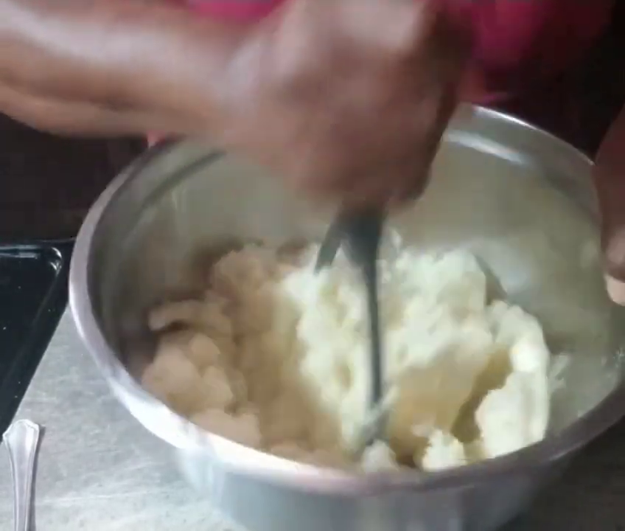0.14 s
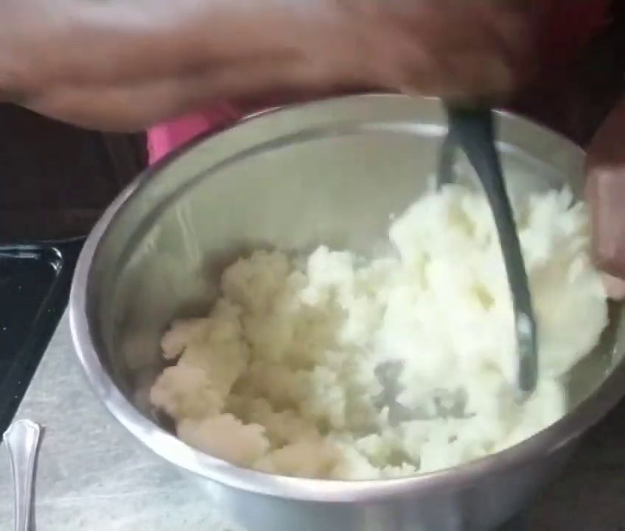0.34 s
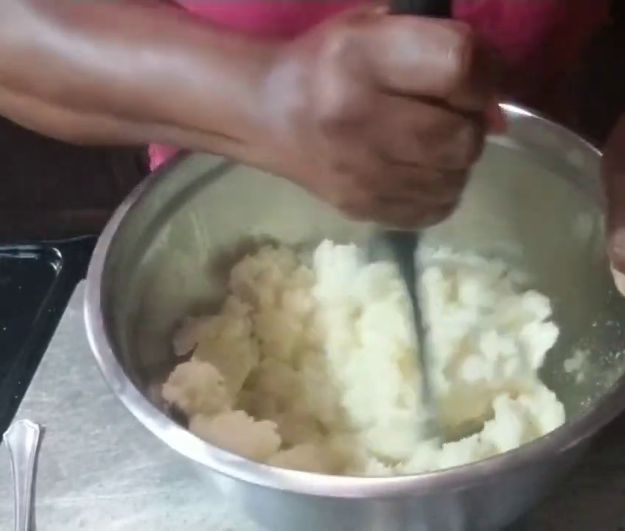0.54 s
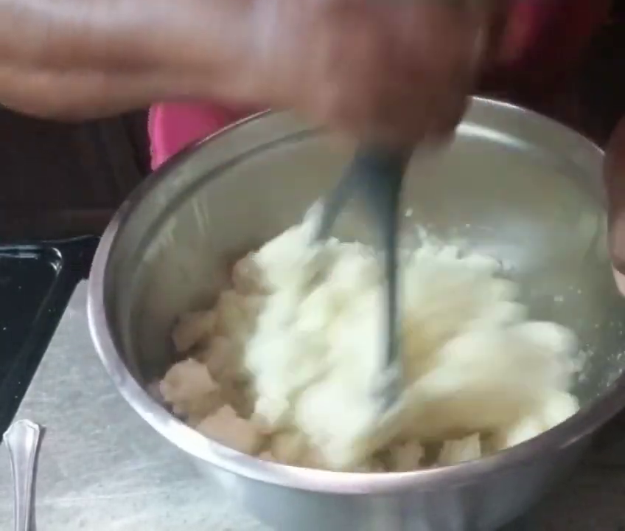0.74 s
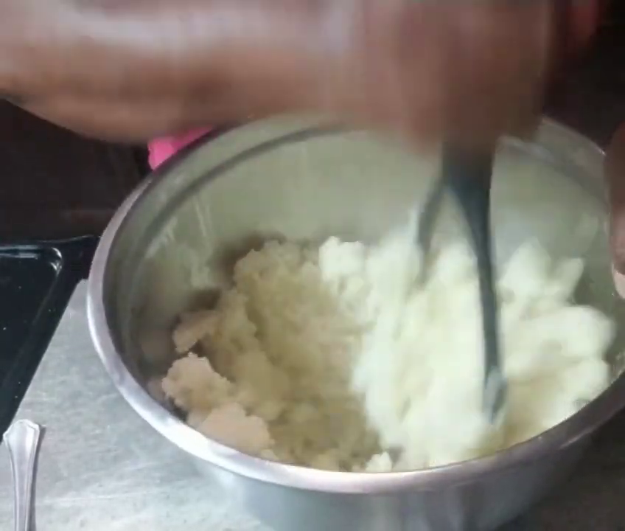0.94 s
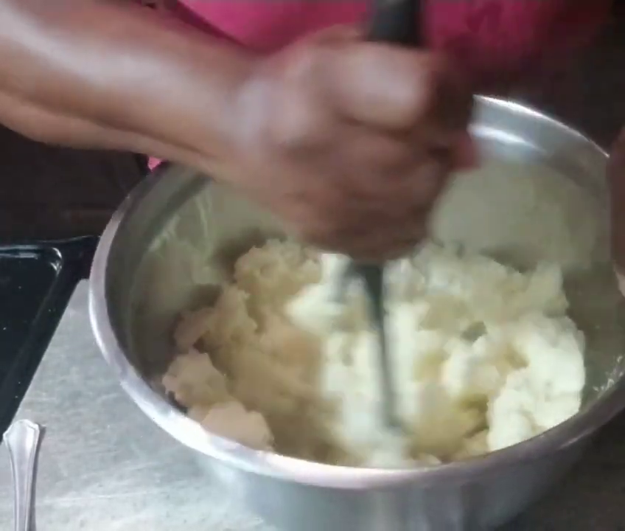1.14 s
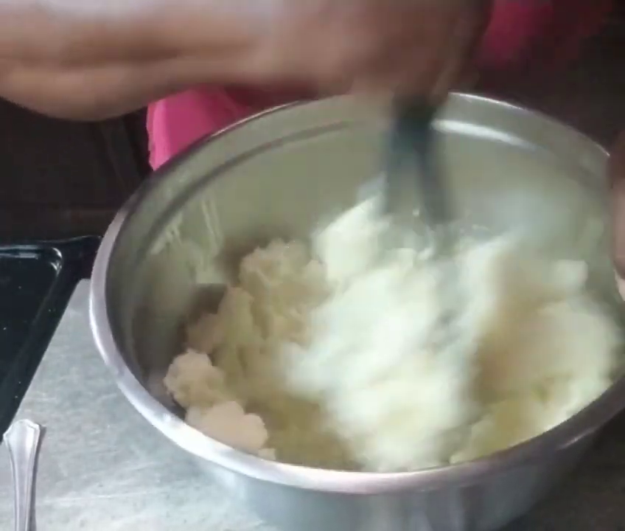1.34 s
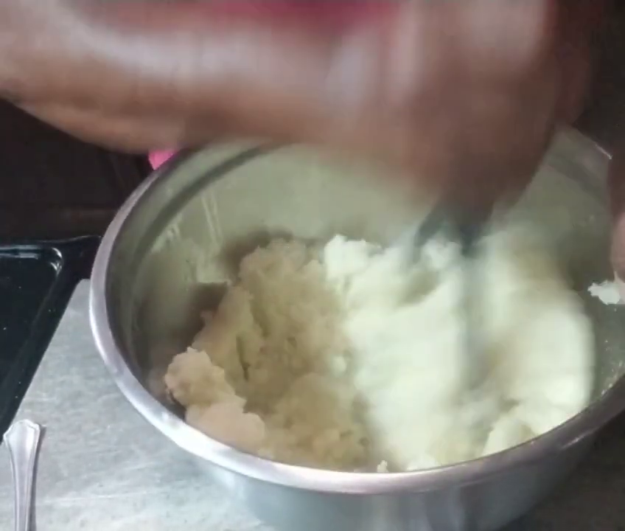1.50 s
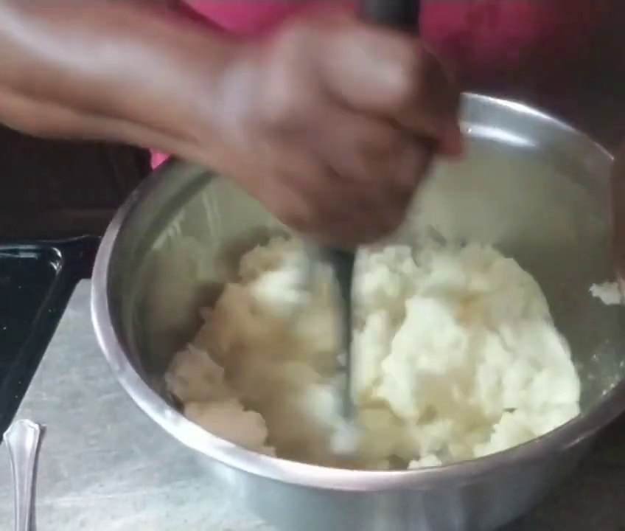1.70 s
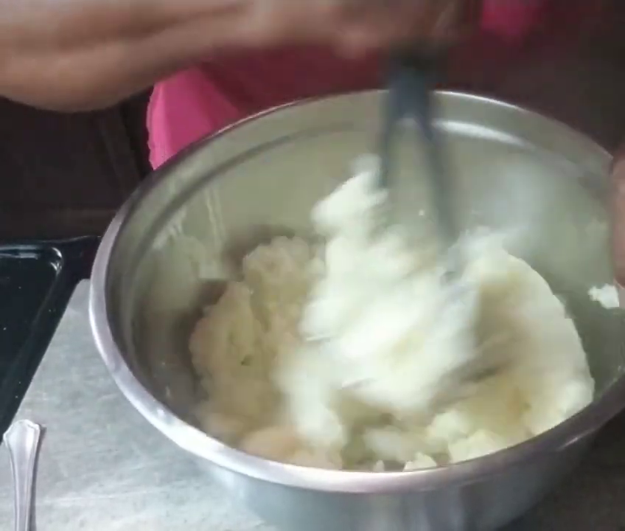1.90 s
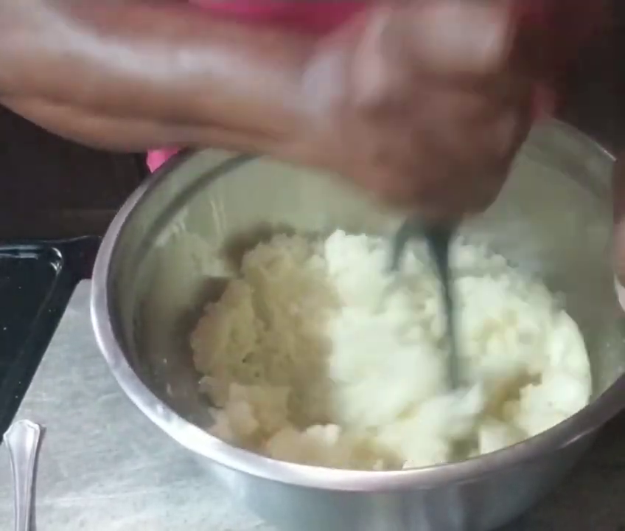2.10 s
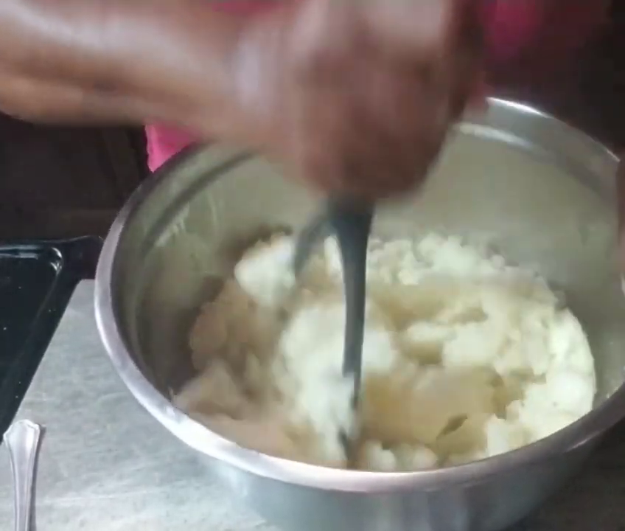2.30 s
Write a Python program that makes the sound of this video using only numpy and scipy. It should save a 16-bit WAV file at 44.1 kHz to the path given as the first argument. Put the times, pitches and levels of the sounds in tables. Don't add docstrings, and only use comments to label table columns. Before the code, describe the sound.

Potatoes being mashed in a metal bowl: one hard thud, then lighter irregular knocks and soft squishes

```python
import sys
import numpy as np
from scipy import signal
from scipy.fft import rfft, irfft, next_fast_len
from scipy.io import wavfile
from scipy.ndimage import uniform_filter1d

SR = 44100
rng = np.random.default_rng(int(sys.argv[2]) if len(sys.argv) > 2 else 0)


def to_wav(s):
    ch = np.atleast_2d(s).T
    pcm = np.round(np.clip(ch, -1, 1) * 32767)
    wavfile.write(sys.argv[1], SR, pcm.astype(np.int16))


def voltage_ratio(level):
    return 10 ** (np.asarray(level, float) / 20)


N = 103635

# pitch_hz, level_db, t60_s
COUNTER_MODES = [(77.4, -5.5, 0.16), (97, 1, 0.073), (129, 9, 0.033), (168.6, -8, 0.11), (210.8, 1, 0.081)]
# pitch_hz, level_db, t60_s
BOWL_FLOOR_MODES = [(281.5, -8.5, 0.0655), (390.6, -5, 0.039), (485, 4.5, 0.014), (554.3, -1, 0.016),
                    (655, -4, 0.03), (773, -6.5, 0.21), (846, -24.5, .06)]
# pitch_hz, level_db
WALL_MODES = [(980, -21), (1195, 2), (1320, -1.5), (1385, -11), (1680, -4), (1780, -1), (2160, -15.5),
              (2340, -9.5), (2680, -11), (3680, -14), (5750, -14.5), (6700, -14)]
# start_s, counter_thud_db, knock_db, colour_octaves (over 400 Hz)
KNOCKS = [(0.189, -33.5, -37.5, 0.84), (.202, -61, -27, 0.8), (0.2065, -36, -12, 0.85),
          (0.2082, -8.5, -2.5, 0.086), (0.221, -45, -19, -0.23), (0.241, -17.5, -22, -0.36),
          (.255, -27, -18, -0.37), (0.277, -42, -49, -0.71), (0.307, -32, -57, -0.75), (0.353, -28, -18, 1),
          (0.357, -51, -25, 0.95), (.364, -31.5, -30, 0.95), (0.474, -30, -26, 0.011),
          (.695, -20, -29.5, 0.45), (.701, -20, -21.5, -0.43), (0.722, -52, -36, -0.11),
          (.738, -40, -33.5, 0.41), (.983, -43, -41, -0.26), (.994, -50, -42.5, -.2),
          (1.021, -50.5, -52, -0.11), (1.263, -49, -34, -.3), (1.268, -12, -13.5, -0.39),
          (1.274, -28, -24.5, -0.12), (1.289, -19, -28, 0.96), (1.304, -35, -26, 0.0087),
          (1.397, -36.5, -53, 0.45), (1.447, -41, -44.5, -0.19), (1.519, -59, -26, 0.14),
          (1.5312, -36.5, -35.5, .8), (1.533, -18.5, -10, 0.15), (1.546, -55, -28, 1),
          (1.738, -68, -30.5, -0.37), (1.7465, -28, -26.5, -0.32), (1.784, -38.5, -39, -0.37),
          (2.1514, -41, -23, 1)]
# start_s, counter_thud_db, knock_db,
# colour_octaves (over 400 Hz)
MORE_KNOCKS = [
    (0.522, -46, -39.5, 0.28),
    (.560, -46, -39, 0.35),
    (1.112, -63, -42.5, 0.28),
    (2.201, -64, -39.5, 0.99),
    (2.095, -36, -44, 0),
    (2.164, -39.5, -38, 0.54),
    (2.180, -59, -43, 0.99),
    (2.347, -54, -40.5, 1),
]
# start_s, clank_db, colour_octaves (over 1400 Hz), tick_db
CLANKS = [(.008, -45.5, -0.6, -66), (0.2022, -17.5, -0.18, -36.5), (.206, -21, 0, -37.5),
          (0.2227, -25, -0.06, -59), (0.254, -36, 0.5, -55), (0.3512, -31.5, 2.5, -34),
          (.3545, -36, 2.3, -50), (0.354, -28.5, -0.74, -64), (0.472, -36, -0.3, -58),
          (0.699, -37, 0.5, -69), (.985, -53, 0, -78), (1.014, -52, 0.3, -80), (1.068, -67, 2, -66),
          (1.262, -45, 1, -57), (1.2669, -30, 0.18, -43.5), (1.303, -41, 0.7, -62), (1.4375, -70, -1, -82),
          (1.4853, -77, 1, -61), (1.628, -62, 5, -48.5), (1.739, -56, -1, -70), (1.5169, -24.5, 0.7, -34.5),
          (1.525, -29.5, 0.1, -41.5), (1.528, -32, 1.2, -45), (1.531, -20.5, 0.47, -30.5),
          (1.745, -46, -0.6, -75), (1.781, -62, -2, -74), (1.997, -69, 3, -55.5), (2.092, -41.5, 1, -52),
          (2.1509, -40, .9, -40.5), (2.223, -43, 0.1, -56), (2.349, -33.5, 0.5, -43)]
# pitch_hz, density_db (per Hz)
TICK_COLOUR = [(900, -5.5), (1800, -7.5), (2700, -1.5), (3300, -8.5), (6800, -9), (8600, -16.5),
               (16000, -20)]
# pitch_hz, density_db (per Hz)
SPLAT_COLOUR = [(900, -1), (2000, -10), (3300, -28.5), (5800, -0.5), (7500, -1), (9000, -7), (16000, -10)]
# pitch_hz, density_db (per Hz)
SLOP_COLOUR = [(500, -0.5), (800, 0.5), (1300, -3), (1750, -7), (2600, -16.5), (4000, -34)]
# start_s, pressure_db, scrape_db (over pressure)
DRAG = [(0, -60.5, -5.5), (.08, -66, -7), (0.345, -69.5, -9), (0.356, -50.5, -3), (0.448, -50, 0),
        (0.508, -57.5, -10), (0.608, -53.5, -5.5), (0.679, -73.5, 2), (0.938, -87.5, 4),
        (0.998, -72.5, -1.5), (1.159, -60.5, -3.5), (1.351, -84, 4), (1.658, -54.5, -4),
        (1.95, -105.5, 2.5), (2.04, -63, 7), (2.11, -59, -1), (2.241, -55.5, -8), (2.35, -70.5, 6)]
# pitch_hz, density_db (per Hz)
SQUISH_COLOUR = [(300, -10.5), (560, -0.5), (850, -23.5), (1900, -7.5), (3300, -17), (8500, -40),
                 (9500, -25), (13000, -19.5), (16000, -34)]
# pitch_hz, density_db (per Hz)
SCRAPE_COLOUR = [(3500, -16), (4800, -14.5), (6500, -10), (8100, -12.5), (8700, -18), (10000, -62.5)]
# pitch_hz, t60_s
KITCHEN_DECAY = [(60, 0.2), (1000, 0.23), (12000, 0.16)]
# pitch_hz, density_db (per Hz)
KITCHEN_COLOUR = [(20, 1), (300, -1.5), (1200, -1.5), (1750, -6.5), (3000, -1), (20000, -1.5)]
# multiple (of the hum pitch), level_db
HUM_ORDERS = [(1, -62), (2, -65), (3, -67), (4, -69), (5, -66), (8, -62)]
# pitch_hz, density_db (per Hz)
AIR_COLOUR = [(25, -30), (48, -6), (199, -22), (263, -24.5), (318, -21.5), (421, -25.5), (480, -33.5),
              (1000, -62.5), (1300, -102.5), (2200, -120)]
# pitch_hz, density_db (per Hz)
HISS_COLOUR = [(800, -3), (1200, -7), (3300, -10), (4800, -3), (7000, -2.5), (9000, -6.5), (12300, -0.5),
               (16000, -2.5)]
# start_s, opening_db
GATE = [(0, -1), (.2, 4.5), (.34, -8.5), (.355, 3.5), (.54, 2.5), (.6, 1.5), (.68, 4), (.92, -4.5),
        (1.0, 9.5), (1.06, -3), (1.13, 6), (1.4, -3.5), (1.5, 4.5), (1.6, 3.5), (1.82, -2), (1.96, -1.5),
        (2.04, 9), (2.35, 2)]
# pitch_hz, likeness (0 to 1)
PORT_LIKENESS = [(60, .995), (400, .975), (560, .5), (1400, .3), (3000, 0)]
# pitch_hz, left_over_right_db
PORT_BALANCE = [(120, .5), (300, 1.2), (700, 3.5), (5000, .2), (12000, 3.4)]

COUNTER_PUSH_S, FLOOR_PUSH_S = 0.0045, 0.0014
SPOT_DB, SPOT_DETUNE = 2.5, 0.016
FLOOR_NARROW_DB, WALL_NARROW_DB = 9, 18
BLOOM_S = 0.0012
FLOOR_LONGEST_T60_S, WALL_T60_S = 0.05, 0.022
CRUNCH_LEVEL, CRUNCH_S = 0.12, 0.003
TICK_RISE_S, TICK_T60_S = 0.001, 0.023
SMEAR_DB, SMEAR_T60_S = -11.5, 0.2
SLOP_DB, SLOP_RISE_S, SLOP_T60_S = -27.5, 0.0023, 0.13
SLIPS_PER_S, SLIP_SPREAD_DB = 2300, 3.5
FUZZ_DB, FUZZ_T60_S = -1, 0.022
KITCHEN_DB = -10.5
DUCK_OVER_DB, DUCK_SHARE, RECOVER_DB_PER_S = -24, 0.18, 58.5
HUM_HZ, HUM_DB, HUM_WAVER_DB = 52.5, -3, 1.2
AIR_DB, HISS_DB = -55, -65
MIC_HZ, EDGE_HZ, LEAK_DB, CEILING = 50, 15700, -27, 0.93


def knocks():
    out = np.zeros((2, N))
    floor = np.minimum(BOWL_FLOOR_MODES, [SR, SR, FLOOR_LONGEST_T60_S])
    counter_push = np.hanning(int(COUNTER_PUSH_S * SR))
    for start_s, thud_db, knock_db, colour in KNOCKS + MORE_KNOCKS:
        add(out, start_s, -voltage_ratio(thud_db) * ring(COUNTER_MODES, counter_push))
        push = np.hanning(int(FLOOR_PUSH_S * SR / 2 ** colour) + 3)
        knock = ring(floor, push, 400 * 2 ** colour, FLOOR_NARROW_DB)
        add(out, start_s, voltage_ratio(knock_db) * knock)
    return out


def clanks():
    out = np.zeros((2, N))
    t = np.arange(800) / SR
    wall = [(hz, db, WALL_T60_S) for hz, db in WALL_MODES]
    for start_s, clank_db, colour, _ in CLANKS:
        rough = np.exp(-t / CRUNCH_S) * rng.standard_normal(len(t))
        push = (t == 0) + CRUNCH_LEVEL * rough
        add(out, start_s, voltage_ratio(clank_db) * ring(wall, push, 1400 * 2 ** colour, WALL_NARROW_DB))
    return out


def ticks():
    t = np.arange(12000)[None] / SR
    shape = np.zeros((2, N))
    for start_s, _, colour, tick_db in CLANKS:
        wet = np.clip(colour - 1, 0, 1)
        share = np.sqrt([[1 - wet], [wet]])
        rise = np.minimum(t / TICK_RISE_S, 1)
        fall = voltage_ratio(-60 * t / TICK_T60_S) + voltage_ratio(SMEAR_DB - 60 * t / SMEAR_T60_S)
        add(shape, start_s, share * voltage_ratio(tick_db) * rise * fall)
    crack = shape[0] * pair(noise(), TICK_COLOUR)
    splat = shape[1] * pair(noise(), SPLAT_COLOUR)
    return crack + splat


def slop():
    t = np.arange(9000)[None] / SR
    shape = np.zeros((1, N))
    for start_s, _, knock_db, _ in KNOCKS + MORE_KNOCKS:
        fall = voltage_ratio(knock_db + SLOP_DB - 60 * t / SLOP_T60_S)
        add(shape, start_s, fall * np.minimum(t / SLOP_RISE_S, 1))
    return shape * voltage_ratio(2.3 * wander(150)) * pair(noise(), SLOP_COLOUR)


def drag():
    start_s, pressure_db, scrape_db = np.transpose(DRAG)
    t = np.arange(N) / SR
    slip_sizes = voltage_ratio(SLIP_SPREAD_DB * np.minimum(rng.exponential(1, N), 5))
    slips = slip_sizes * (rng.random(N) < SLIPS_PER_S / SR)
    roughness = evened(signal.lfilter([1], [1, -0.985], slips))
    grain = (0.83 + roughness) * noise()

    tail_t = t[:5000]
    tail = 0
    for hz, db in WALL_MODES[:-3]:
        tail = tail + voltage_ratio(db - 60 * tail_t / FUZZ_T60_S) * np.sin(2 * np.pi * hz * tail_t)
    wall = evened(signal.oaconvolve(grain[::-1], tail[None], axes=1)[:, :N])

    pressure = voltage_ratio(np.interp(t, start_s, pressure_db) + 0.5 * wander(30))
    squish = pair(grain, SQUISH_COLOUR)
    scrape = voltage_ratio(np.interp(t, start_s, scrape_db)) * pair(grain, SCRAPE_COLOUR)
    return pressure * (squish + voltage_ratio(FUZZ_DB) * wall + scrape)


def kitchen(x):
    taps = pair(noise(), KITCHEN_COLOUR)[:, :SR // 2]
    hz, t, z = signal.stft(taps, SR, nperseg=256)
    decay = voltage_ratio(-60 * t / read(KITCHEN_DECAY, hz)[:, None])
    tail = signal.istft(z * decay, SR, nperseg=256)[1]
    tail = tail * np.minimum(np.arange(tail.shape[1]) / (0.0048 * SR), 1)
    tail = tail / np.linalg.norm(tail[0])
    return signal.fftconvolve(x.mean(0)[None], tail, axes=1)[:, :N]


def ducking(x):
    power = uniform_filter1d((x ** 2).mean(0), size=400)
    power_db = 10 * np.log10(abs(power) + 1e-12)
    recovery = np.arange(N) * RECOVER_DB_PER_S / SR
    held_db = np.maximum.accumulate(power_db + recovery) - recovery
    over_db = np.maximum(held_db - DUCK_OVER_DB, 0)
    return voltage_ratio(-DUCK_SHARE * uniform_filter1d(over_db, size=400))


def background():
    t = np.arange(N) / SR
    hum = 0
    for multiple, db in HUM_ORDERS:
        level = voltage_ratio(db + HUM_DB + HUM_WAVER_DB * wander(9))
        hum = hum + level * np.sin(2 * np.pi * (multiple * HUM_HZ * t + rng.random()))
    air = voltage_ratio(AIR_DB + 0.5 * wander(5.1)) * pair(noise(), AIR_COLOUR)
    gate_db = np.interp(t, *np.transpose(GATE))
    hiss = voltage_ratio(HISS_DB + gate_db + 0.64 * wander(18)) * pair(noise(), HISS_COLOUR)
    return np.sqrt(2) * hum + air + hiss


def ring(modes, push, centre_hz=100, narrow_db=0):
    hz, db, t60 = np.transpose(modes)[:, :, None]
    spot = rng.standard_normal((len(modes), 3, 1))
    t = np.arange(int(t60.max() * SR)) / SR
    apart = np.arccos(np.clip(read(PORT_LIKENESS, hz), -1, 1)) * np.sign(spot[:, 2]) / 2
    turn = 2j * np.pi * hz * (1 + SPOT_DETUNE * spot[:, 0]) - np.log(1000) / t60
    off_centre_db = narrow_db * np.log2(hz / centre_hz) ** 2
    size = voltage_ratio(db + SPOT_DB * spot[:, 1] - off_centre_db)
    ports = []
    for side in (1, -1):
        ports.append(size * voltage_ratio(side * read(PORT_BALANCE, hz) / 2) * np.exp(1j * side * apart))
    ringing = (np.hstack(ports).T @ np.exp(turn * t)).imag
    bloom = 1 - np.exp(-t / BLOOM_S)
    out = signal.oaconvolve(ringing * bloom, push[None], axes=1)
    return out / abs(out).max()


def pair(x, colour):
    size = next_fast_len(N)
    hz = np.fft.rfftfreq(size, 1 / SR)
    a, b = rfft(x, size)
    same = np.clip(read(PORT_LIKENESS, hz), -1, 1)
    balance = voltage_ratio(read(PORT_BALANCE, hz) / 2)
    gain = voltage_ratio(read(colour, hz)) * (hz > 0.7 * colour[0][0])
    left = a * balance
    right = (same * a + np.sqrt(1 - same ** 2) * b) / balance
    return evened(irfft(np.array([left, right]) * gain, size)[:, :N])


def noise():
    return rng.standard_normal((2, N))


def wander(rate_hz):
    t = np.arange(N) / SR
    rates = np.geomspace(rate_hz / 10, rate_hz, 12)
    return evened(sum(np.sin(2 * np.pi * (f * t + rng.random())) for f in rates))


def evened(x):
    return x / np.sqrt(np.mean(x ** 2) + 1e-20)


def read(points, hz):
    f, value = np.transpose(points)
    return np.interp(np.log(hz + 1), np.log(f + 1), value, left=value[0], right=value[-1])


def add(mix, start_s, sound):
    part = mix[:, round(start_s * SR):][:, :sound.shape[1]]
    part += sound[:, :part.shape[1]]


def scene():
    blows = knocks() + clanks() + ticks()
    near = blows + drag() + slop()
    far = voltage_ratio(KITCHEN_DB) * kitchen(near) + background()
    return near + ducking(blows) * far


def top_cut(x):
    return signal.sosfilt(signal.butter(12, 16920, fs=SR, output="sos"), x)


def record(dry):
    x = signal.sosfilt(signal.butter(5, MIC_HZ, "high", fs=SR, output="sos"), dry)
    band_limit = signal.firwin(301, EDGE_HZ, window=("kaiser", 6), fs=SR)
    x = voltage_ratio(LEAK_DB) * x + signal.oaconvolve(x, band_limit[None], "same")
    return top_cut(np.clip(x, -CEILING, CEILING))


dry = scene()
out = record(dry)
to_wav(out)
```